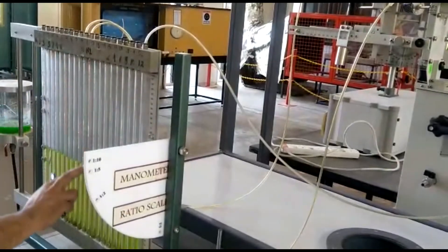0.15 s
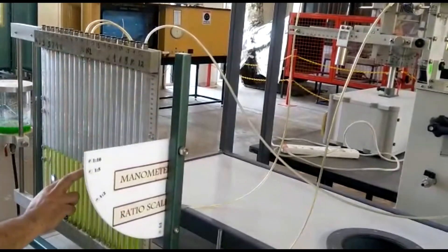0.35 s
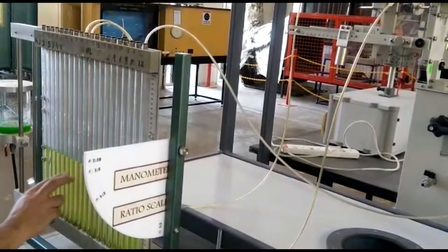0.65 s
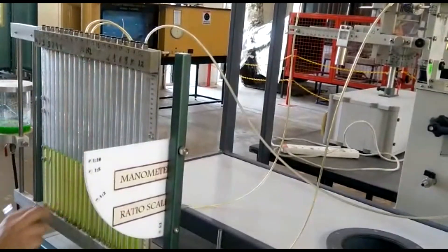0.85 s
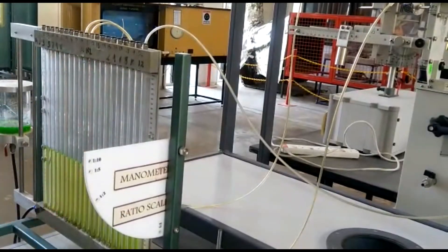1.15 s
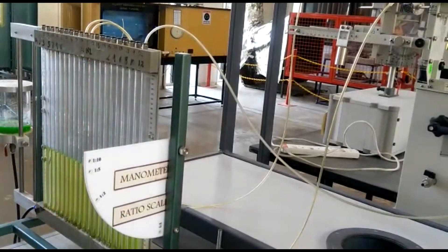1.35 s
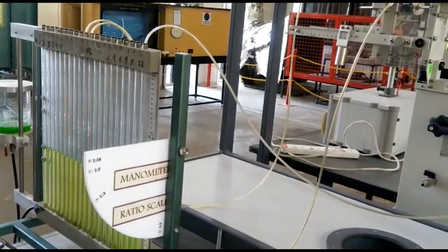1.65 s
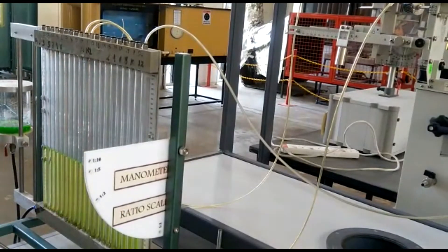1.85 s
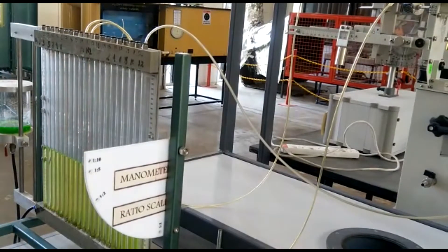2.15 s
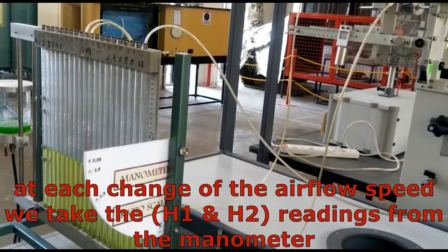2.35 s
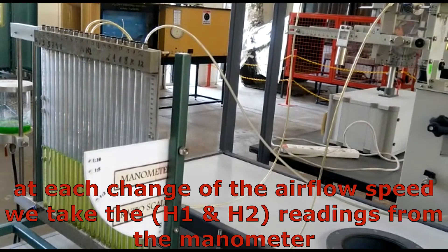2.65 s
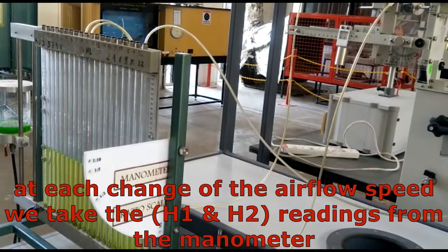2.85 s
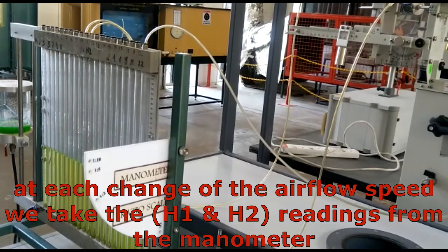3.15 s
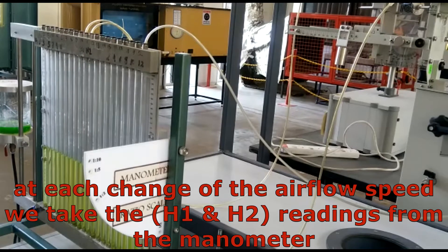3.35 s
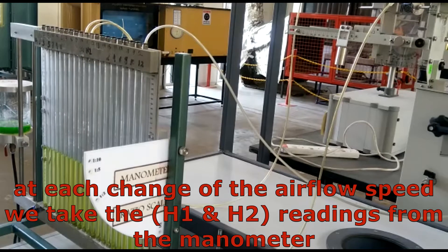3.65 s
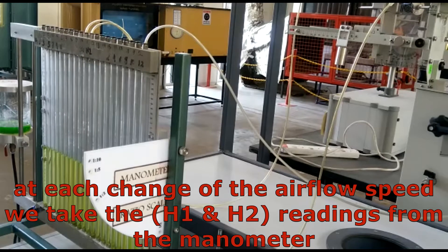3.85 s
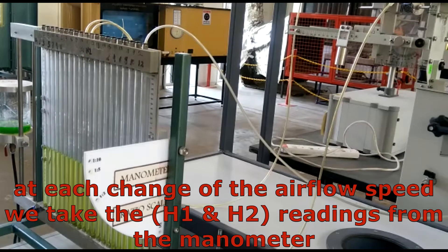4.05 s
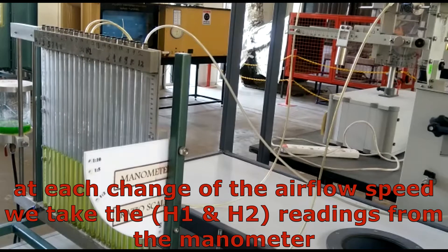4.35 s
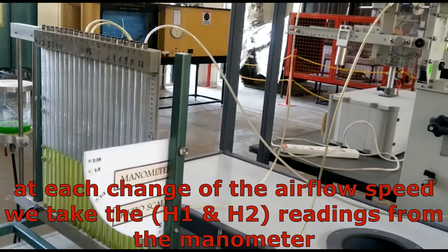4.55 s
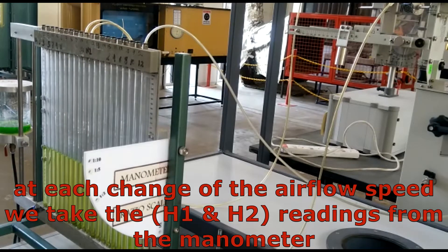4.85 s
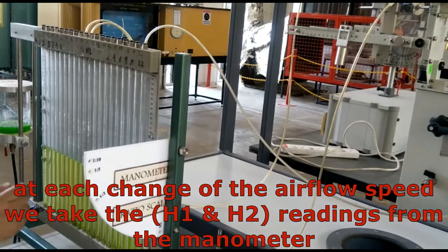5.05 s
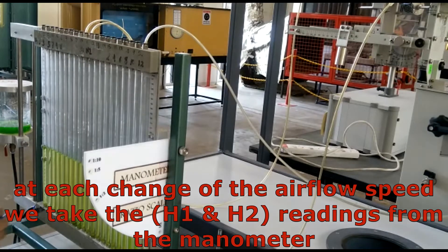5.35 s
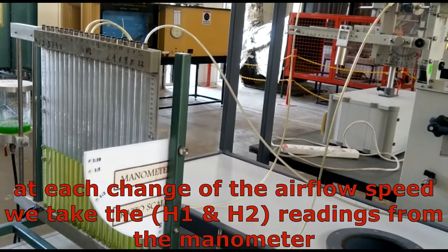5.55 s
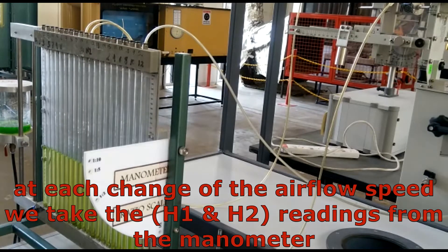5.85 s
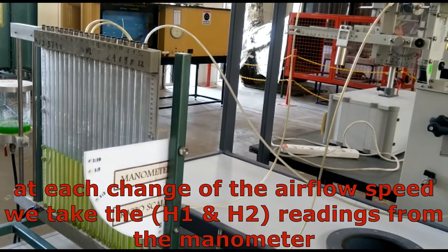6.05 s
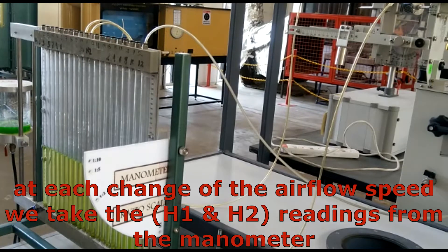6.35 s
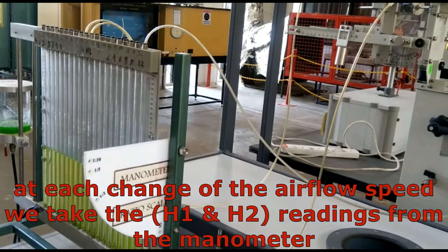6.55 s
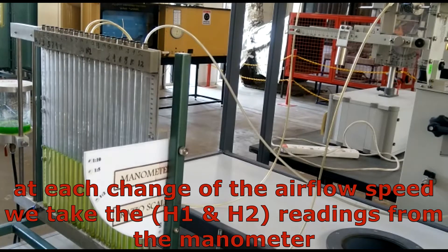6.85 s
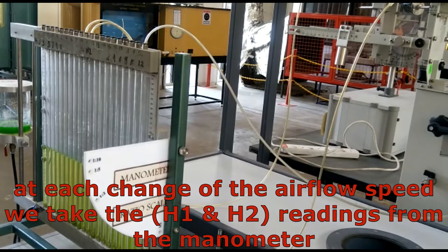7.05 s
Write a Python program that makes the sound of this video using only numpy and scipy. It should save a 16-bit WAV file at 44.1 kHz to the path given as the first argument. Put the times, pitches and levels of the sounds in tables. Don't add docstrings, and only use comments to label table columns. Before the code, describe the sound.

A large fan drones steadily with a wavering, throbbing low-mid hum, over soft low rumble and an even rush of air in a hard-walled lab.

```python
import sys
import numpy as np
from scipy import signal
from scipy.fft import rfft, irfft, next_fast_len
from scipy.io import wavfile
from scipy.ndimage import uniform_filter1d

SR = 44100
rng = np.random.default_rng(int(sys.argv[2]) if len(sys.argv) > 2 else 0)


def natural_amplitude(level_db):
    exponent = np.asarray(level_db, float) / 20
    return 10 ** exponent


def generate_wav(signal):
    frames = np.transpose(np.atleast_2d(signal))
    scaled = np.clip(frames, -1, 1) * 32767
    pcm = np.round(scaled).astype(np.int16)
    wavfile.write(sys.argv[1], SR, pcm)


N = 317948
T = np.arange(N) / SR


def evened(x):
    return x / np.sqrt(np.mean(abs(x) ** 2) + 1e-20)


def column(rows, at, order=1):
    rows = np.transpose(rows)
    return np.interp(at, rows[0], rows[order])


def read(points, hz):
    f, db = np.transpose(points)
    return np.interp(np.log(hz + 1), np.log(f + 1), db, -120, -120)


def shaped(x, gain):
    size = next_fast_len(N)
    hz = np.fft.rfftfreq(size, 1 / SR)
    return irfft(rfft(x, size) * gain(hz), size)[:N]


def drift(per_s):
    return evened(shaped(rng.standard_normal(N), lambda hz: np.exp(-(hz / per_s) ** 2)))


def levelled(x, span_s):
    size = max(round(span_s * SR), 8)
    power = uniform_filter1d(uniform_filter1d(x ** 2, size), size)
    return evened(x / np.sqrt(abs(power) + 1e-12))


def gate(above, per_s, ramp_s):
    is_open = 1. * (drift(per_s) > above)
    return uniform_filter1d(is_open, max(round(ramp_s * SR), 2))


def swells(rows, calm_db):
    total = natural_amplitude(calm_db)
    for centre, length, db in rows:
        total = total + natural_amplitude(db) * np.cos(np.pi * np.clip((T - centre) / length, -.5, .5))
    return total


# f/Hz, level/dB [dB per Hz]
AIR_COLOUR = [(380, -0.3), (480, -4.6), (700, -8.3), (1000, -13.0), (1500, -9.1), (2000, -13.8),
              (2600, -18.1), (3100, -14.1), (3740, -13.6), (3800, -10.8), (6500, -12.8), (7400, -15.5),
              (7900, -25.3), (8300, -42.2)]
# f/Hz, width/Hz, level/dB [over the stream]
STANDING_WAVES = [(418, 36, 0.9), (539, 67, -1.1), (604, 29, 6.7), (648, 25, 0.6), (763, 50, 8.9),
                  (871, 93, 10.6), (950, 38, 8.8), (1010, 79, 11.0), (1108, 93, 7.6), (1236, 62, 6.5),
                  (1366, 37, 7.2), (1508, 159, 0.2), (1726, 159, 4.1), (1946, 28, -1.1), (2019, 18, 3.7),
                  (2120, 52, 1.4), (2237, 159, 4.4), (2370, 51, 6.1), (2490, 83, 4.3), (2705, 80, 6.5),
                  (2801, 51, 2.4), (3066, 44, -3.3), (3246, 20, -0.1), (3302, 18, -1.3), (3406, 57, 2.2),
                  (3682, 40, 1.9), (3793, 50, 0.8), (3899, 129, -0.6), (4017, 43, 0.1), (4206, 62, -4.2)]
RUSH_DB = -26
SHAFT_HZ = 22.31
RIPPLE_DB, RIPPLE_HZ = 1.3, 14


def rush():
    def colour(hz):
        rings = sum(natural_amplitude(2 * db) / (1 + (2 * (hz - f) / width) ** 2) ** 2
                    for f, width, db in STANDING_WAVES)
        skirt = natural_amplitude(read([(275, -5), (300, 4), (330, 11.0), (365, 3.0), (374, 11), (379, 1.5)], hz))
        ripple = np.interp(hz / RIPPLE_HZ, np.arange(2000), rng.standard_normal(2000))
        stream = natural_amplitude(read(AIR_COLOUR, hz) + RIPPLE_DB * ripple)
        return stream * np.sqrt(1 + rings) + skirt

    air = shaped(rng.standard_normal(N), colour)
    above_drone = shaped(air, lambda hz: hz > 500)
    gusts_db = 0.13 * drift(per_s=4.5)
    rotor_db = 0.19 * np.cos(2 * np.pi * 3 * SHAFT_HZ * T)
    return natural_amplitude(RUSH_DB + gusts_db + rotor_db) * air / np.std(above_drone)


# f/Hz, level/dB [dB per Hz]
RUMBLE_COLOUR = [(12, -42), (30, -25), (60, -14.5), (72, -10.5), (80, -9.5), (97, -3.5), (108, -4.5),
                 (125, 1), (150, -3.5), (165, -2.5), (200, -6.5), (225, -8), (270, -10), (300, -9.5)]
# t/s [centre], length/s, level/dB [rise]
DEEP_GUSTS = [(0.03, 0.1, -30), (0.31, 0.41, -32.5), (0.6, 0.49, -30.5), (0.83, 0.3, -35.5),
              (1.28, 0.13, -37), (1.69, 0.45, -33.7), (2.34, 0.092, -27), (2.49, 0.09, -25.5),
              (2.77, 0.3, -29.7), (3.01, 0.45, -31.3), (3.07, 0.1, -26.5), (3.19, 0.1, -35),
              (3.5, 0.15, -31.8), (3.89, 0.1, -31), (3.89, 0.45, -32), (4.27, 0.35, -32),
              (4.65, 0.51, -32.9), (5.21, 0.52, -39), (5.66, 0.18, -30.0), (5.89, 0.28, -38),
              (6.15, 0.38, -31.5), (6.43, 0.1, -32), (6.73, 0.1, -35), (7.13, 0.51, -34)]
# t/s [centre], length/s, level/dB [rise]
UPPER_GUSTS = [(0.06, 0.45, -35.3), (0.5, 0.37, -36), (0.93, 0.45, -37.2), (1.32, 0.073, -32.5),
               (1.62, 0.42, -44), (1.83, 0.11, -30), (2.07, 0.089, -34), (2.31, 0.55, -35),
               (2.43, 0.066, -34.2), (2.85, 0.24, -33), (3.28, 0.45, -32.5), (3.79, 0.34, -37),
               (4.07, 0.32, -29), (4.14, 0.08, -33), (4.56, 0.27, -32), (5.0, 0.5, -32.1),
               (5.27, 0.099, -34), (5.48, 0.17, -30), (5.7, 0.069, -32), (5.73, 0.51, -34.3),
               (6.23, 0.3, -37.2), (6.42, 0.08, -34), (6.68, 0.1, -29), (7.15, 0.18, -32)]
DEEP_CALM_DB, UPPER_CALM_DB = -32.5, -34


def rumble():
    deep = shaped(rng.standard_normal(N), lambda hz: natural_amplitude(read(RUMBLE_COLOUR, hz)) * (hz < 150))
    upper = shaped(rng.standard_normal(N), lambda hz: natural_amplitude(read(RUMBLE_COLOUR, hz)) * (hz > 150))
    deep = swells(DEEP_GUSTS, DEEP_CALM_DB) * levelled(deep, span_s=0.16)
    upper = swells(UPPER_GUSTS, UPPER_CALM_DB) * levelled(upper, span_s=0.17)
    return deep + upper


# t/s [centre], length/s, level/dB [rise]
BLADE_GUSTS = [(0.07, 0.43, -26), (0.31, 0.057, -21.5), (0.56, 0.34, -25.5), (0.9, 0.4, -29),
               (1.13, 0.11, -22), (1.32, 0.47, -31.5), (1.59, 0.2, -22), (1.81, 0.11, -22),
               (1.92, 0.4, -39.5), (2.01, 0.051, -20), (2.1, 0.06, -21.5), (2.43, 0.47, -28.5),
               (2.44, 0.049, -21), (2.88, 0.32, -26), (3.2, 0.24, -21.5), (3.49, 0.31, -22),
               (3.81, 0.32, -22.5), (4.13, 0.28, -27.5), (4.36, 0.25, -28), (4.53, 0.067, -20),
               (4.76, 0.26, -23.5), (4.97, 0.044, -19.5), (5.06, 0.32, -22.5), (5.41, 0.064, -22.5),
               (5.65, 0.15, -24), (5.9, 0.45, -31), (6.2, 0.14, -22), (6.49, 0.16, -17), (6.79, 0.38, -28),
               (7.14, 0.16, -23.5)]
DRONE_CALM_DB = -30.5
BLADE_HZ, WAVER_HZ, WAVERS_PER_S = 347.7, 3.4, 6
THROBS_PER_S = 19.5
DUCT_EDGE_HZ = 380


def drone():
    eddies = drift(per_s=15.7) + 1j * drift(per_s=15.3)
    stall = 2 * np.pi * np.cumsum(THROBS_PER_S * (1 + 0.031 * drift(per_s=1.4))) / SR
    throb = 1 + 0.45 * np.cos(stall) + 0.091 * np.cos(2 * stall + 0.86)
    turns = np.cumsum(BLADE_HZ + WAVER_HZ * drift(WAVERS_PER_S)) / SR
    blades = (1.25 + 0.64 * eddies) * np.exp(2j * np.pi * turns)
    tone = blades.real * throb
    surging = swells(BLADE_GUSTS, DRONE_CALM_DB) * levelled(tone, span_s=0.077)
    return shaped(surging, lambda hz: 1 / np.sqrt(1 + (hz / DUCT_EDGE_HZ) ** 80))


def scene():
    field = rush() + rumble() + drone()
    return np.array([field, field])


MONO_HZ, PRESENCE_HZ, TREBLE_HZ, AIR_HZ = 330, 3755, 4620, 7600
LEAD_S = 61 / 44100
# f/Hz, phase swing/rad, level/dB [loss on the right], steadiness/0-1
BAND_SEAMS = [(490, .3, 2.5, .7), (632, .5, 2, .2), (700, .8, 1.5, .03), (795, .8, 1.5, .15),
              (912, .7, 2, .6), (1112, .9, 3.6, .58), (1305, .85, 2.5, .58), (1590, .75, 3.3, .82),
              (2010, .12, 0, .96), (2500, .6, 3, .88), (2875, .6, 2.6, .86), (3360, 0, 0, .99)]
# f/Hz, phase offset/rad, level/dB [right side], steadiness/0-1
BAND_STEERING = [(330, 3.4, 0, 1), (375, 3.05, -.5, .9), (470, .9, 0, .9), (540, .5, -1.2, .86),
                 (610, -.9, -1.6, .8), (680, -.1, -2.8, .4), (770, .3, -2.6, .5), (850, .5, -1.3, .86),
                 (1000, .3, .5, .96), (1780, .15, 1.2, .97), (2050, .08, -.8, .97), (2700, .15, 1, .97),
                 (3000, .25, -.3, .96), (3130, .15, 5.3, .985)]


def steered_middle(x):
    hz, _, z = signal.stft(x, SR, nperseg=2048, noverlap=1792)
    place = np.interp(hz, np.transpose(BAND_SEAMS)[0], np.arange(len(BAND_SEAMS)))
    seam = np.cos(np.pi * place) ** 4 * (hz > 480)
    step = column(BAND_SEAMS, hz) * np.sin(2 * np.pi * place)
    phase = (2 * np.pi * hz * LEAD_S + column(BAND_STEERING, hz) + step) * (hz > MONO_HZ)
    level = natural_amplitude(column(BAND_STEERING, hz, order=2) - seam * column(BAND_SEAMS, hz, order=2))
    seam_steady = 1 - seam * (1 - column(BAND_SEAMS, hz, order=3))
    steady = np.minimum(column(BAND_STEERING, hz, order=3), seam_steady)[:, None]
    a, b = rng.standard_normal((z.shape[1], len(hz), 2)).T
    wander = uniform_filter1d(uniform_filter1d(a, 7, 0), 5, 1)
    hunt = evened(wander + .3j * uniform_filter1d(b, 7, 0))
    steering = (level * np.exp(1j * phase) * (hz < PRESENCE_HZ))[:, None]
    z = z * steering * (steady + np.sqrt(1 - steady ** 2) * hunt)
    return signal.istft(z, SR, nperseg=2048, noverlap=1792)[1][:N]


TREBLE_OPEN_ABOVE, PRESENCE_SHUT_ABOVE = -.25, 1.35


def steered_treble(x):
    presence = shaped(x, lambda hz: np.exp(1.85j) * (hz > PRESENCE_HZ) * (hz < TREBLE_HZ))
    stray = np.roll(presence, SR)
    treble = shaped(x, lambda hz: (hz > TREBLE_HZ) * (hz < AIR_HZ))
    air = shaped(x, lambda hz: hz > AIR_HZ)
    leak = (1 + .7 * drift(per_s=12)) * presence + natural_amplitude(1 + 3 * drift(per_s=6)) * stray
    leak = natural_amplitude(-24.5) * leak * (1 - gate(PRESENCE_SHUT_ABOVE, per_s=9, ramp_s=.012))
    flips = np.tanh(2.5 * drift(per_s=16)) * gate(TREBLE_OPEN_ABOVE, per_s=10, ramp_s=.02)
    rare = np.maximum(drift(per_s=14) - 1.1, 0)
    return leak + flips * (natural_amplitude(-24) * treble + natural_amplitude(-19) * rare * air)


def band_limit(x):
    return signal.sosfilt(signal.butter(12, 8340, fs=SR, output="sos"), x)


def record(dry):
    right = steered_middle(dry[1]) + steered_treble(dry[1])
    return band_limit(np.array([dry[0], right]))


dry = scene()
out = record(dry)
generate_wav(out)
```